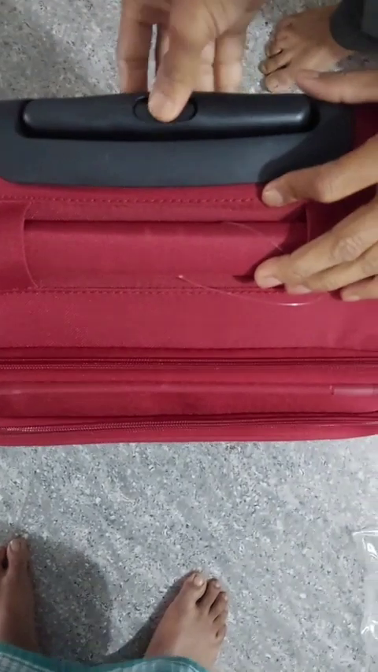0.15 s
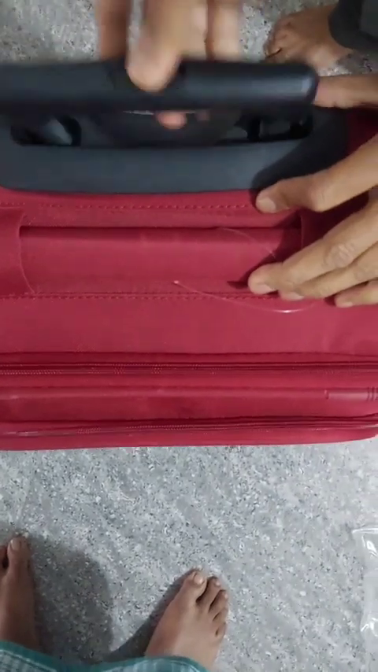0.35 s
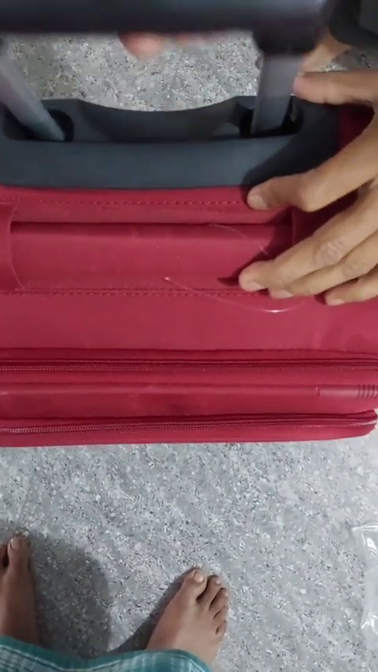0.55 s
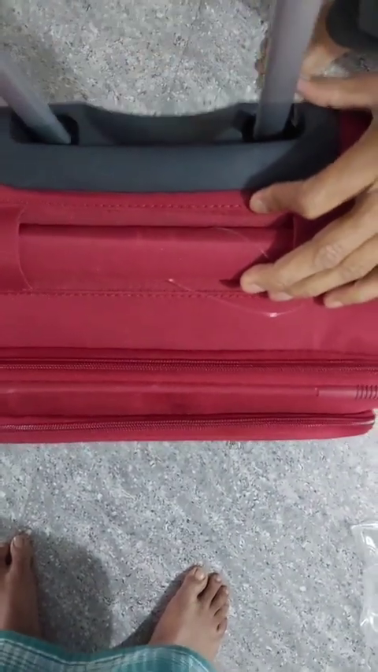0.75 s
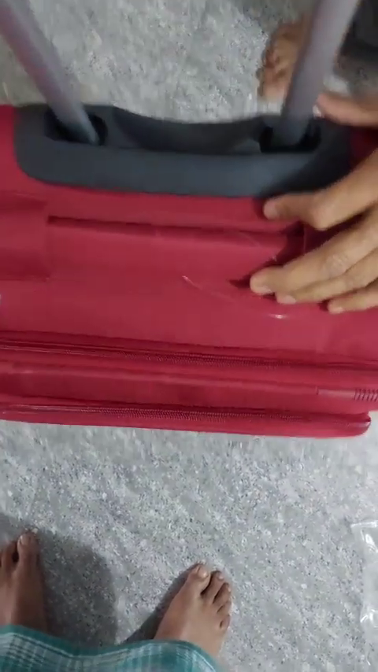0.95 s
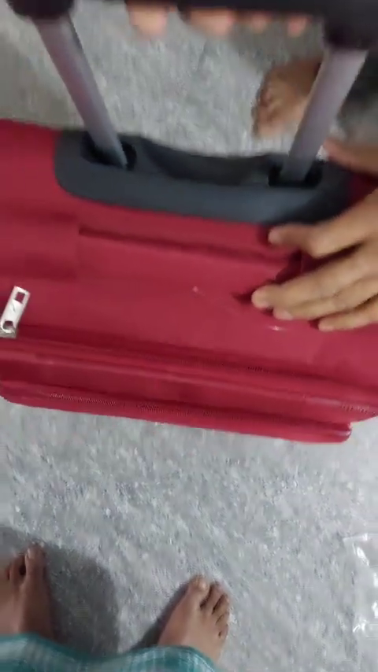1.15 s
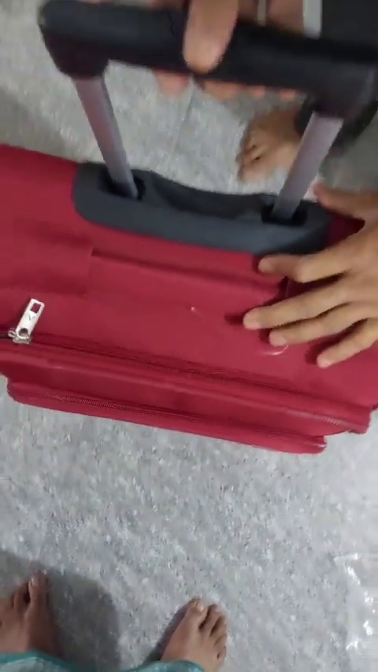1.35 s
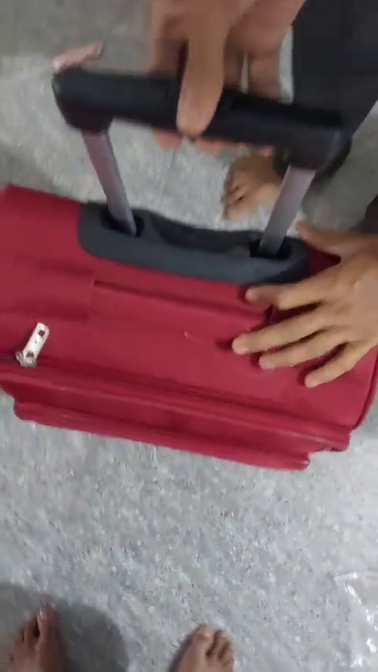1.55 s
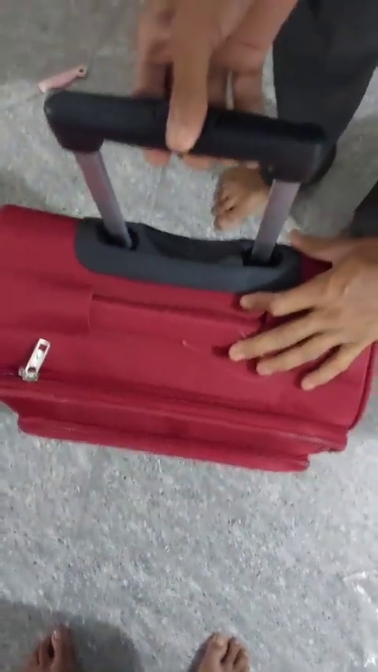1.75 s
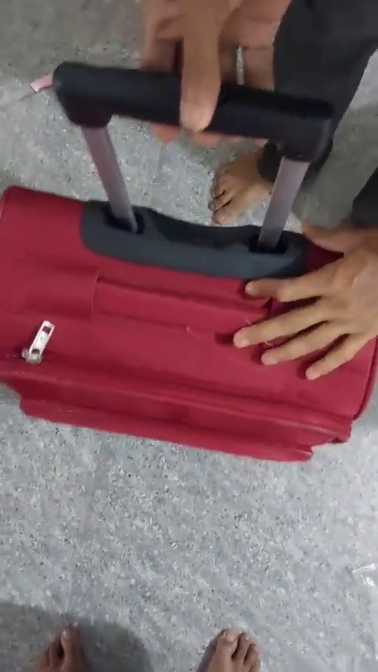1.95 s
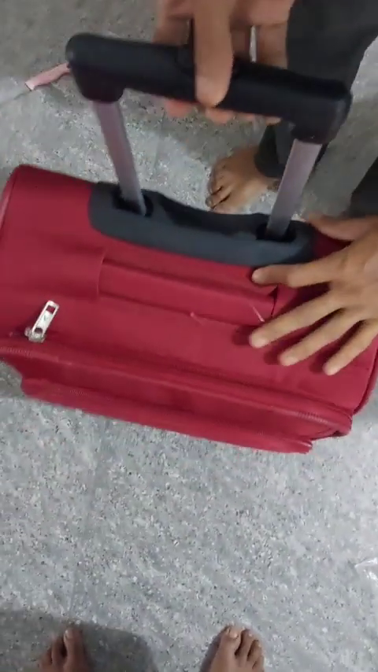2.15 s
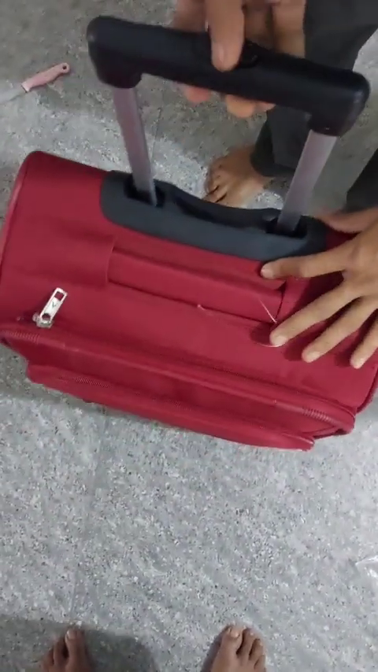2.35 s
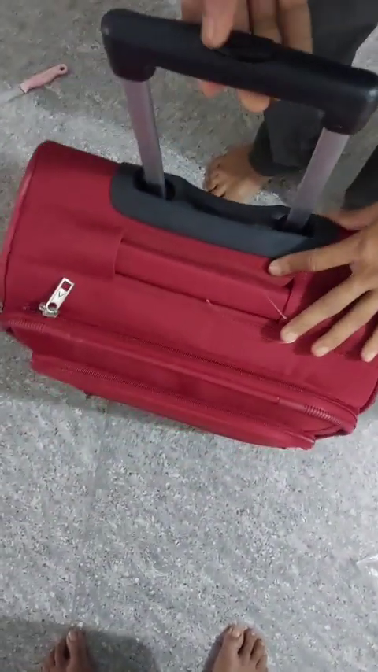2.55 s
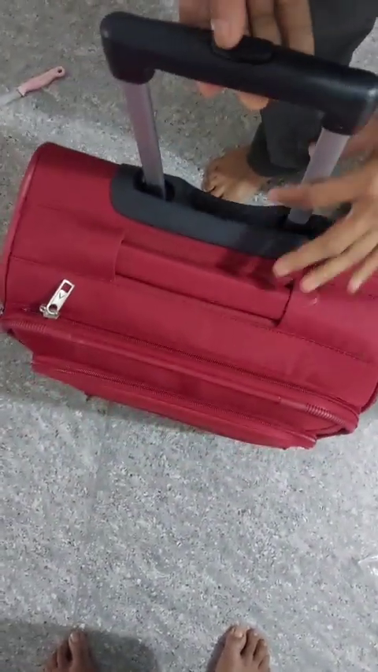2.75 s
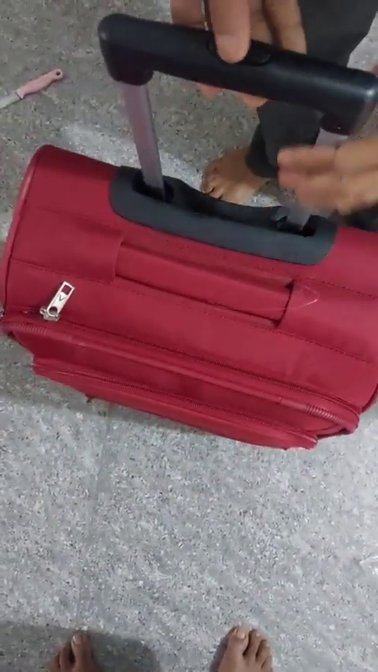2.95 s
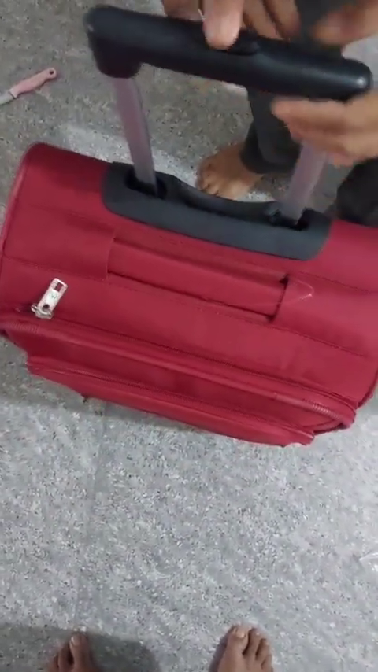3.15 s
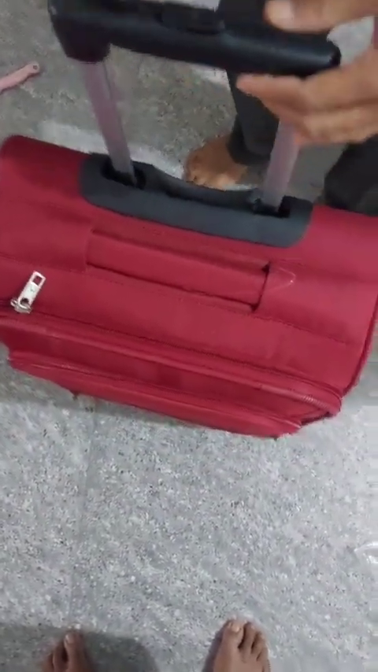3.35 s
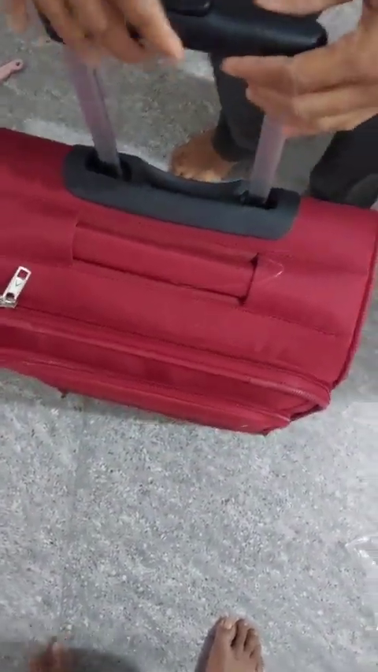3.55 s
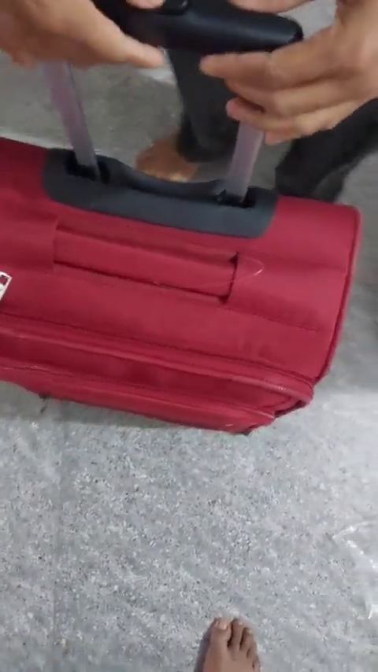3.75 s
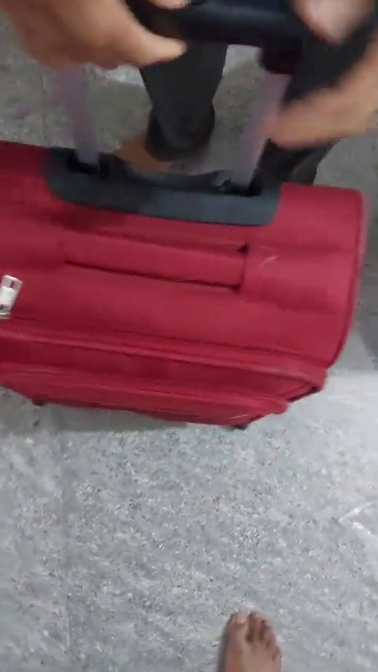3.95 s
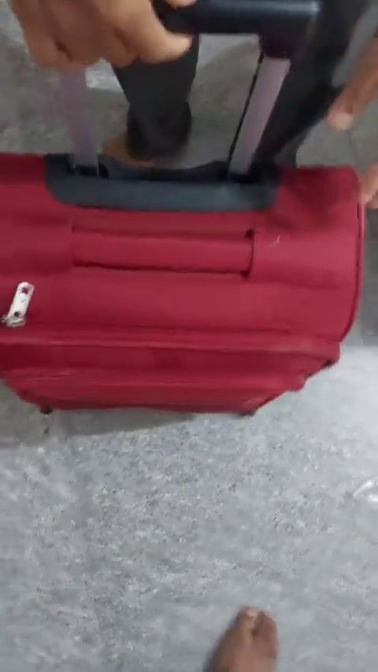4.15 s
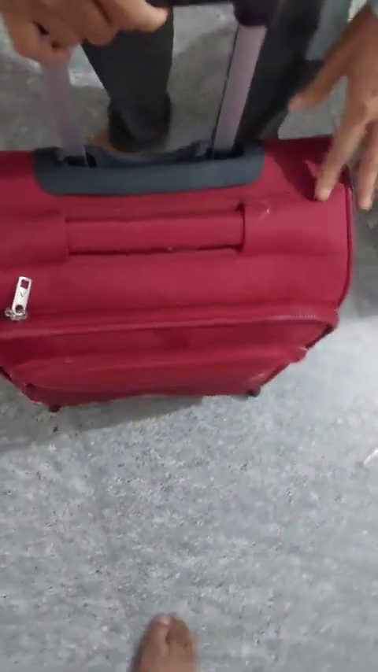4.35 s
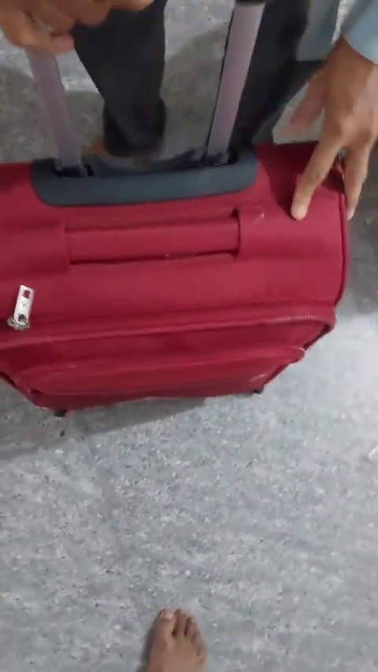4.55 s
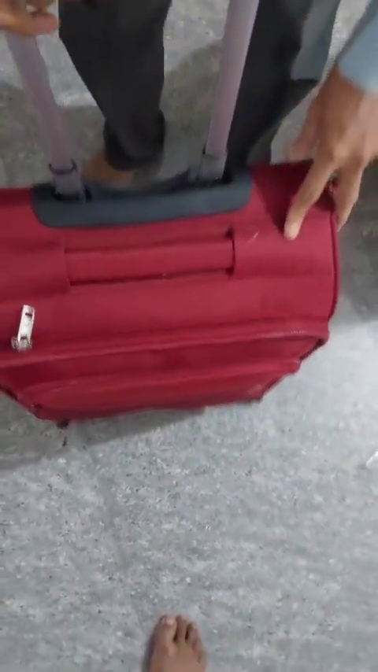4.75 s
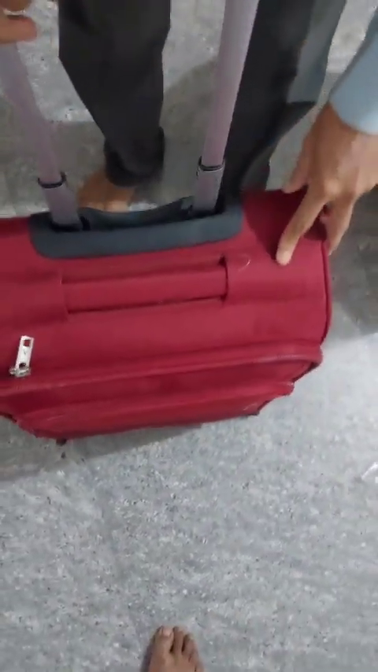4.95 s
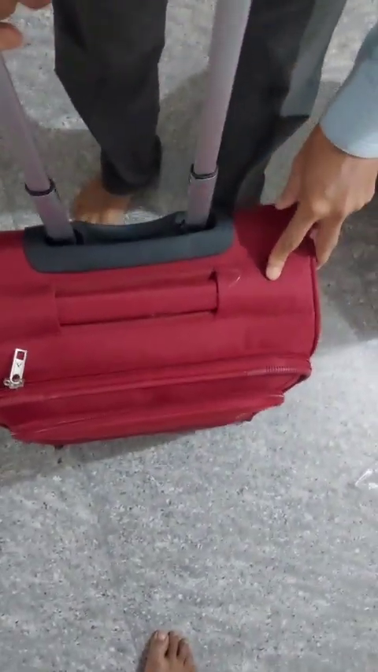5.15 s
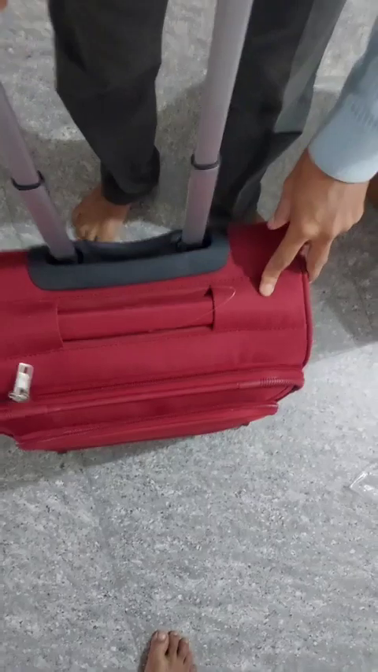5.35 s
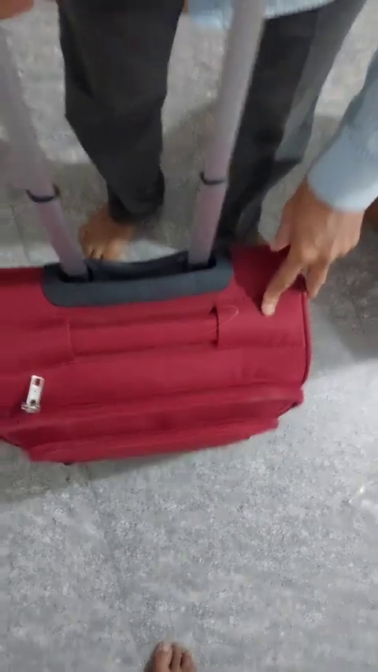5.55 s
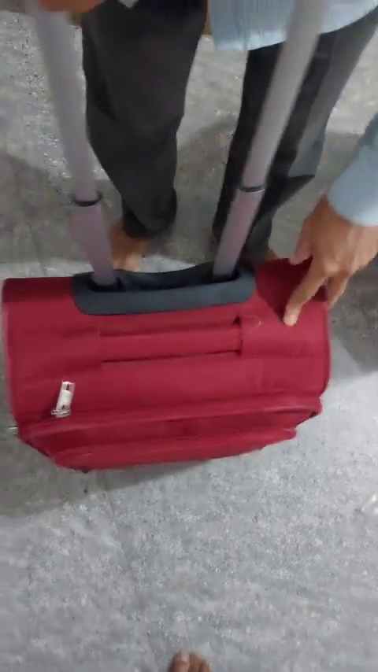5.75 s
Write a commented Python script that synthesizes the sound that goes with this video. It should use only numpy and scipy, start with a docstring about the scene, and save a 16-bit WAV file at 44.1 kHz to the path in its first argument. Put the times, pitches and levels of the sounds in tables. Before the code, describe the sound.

Soft thumps and small knocks open the sound as a hand grips the telescopic handle of a soft suitcase. From about 0.3 seconds the metal tubes slide out with a light swelling hiss, tick at 0.6, then squeak briefly and hit their stop at 0.8 with a sharp clack, the loudest moment. A zipper pull tinkles faintly until about 2 seconds, and a locking pin snaps sharply at 1.4. From 2 to 4.5 seconds it is quiet: hands brush the fabric, the case groans faintly as it turns on the floor, and the loose handle clacks lightly near 3.6. At 4.6 the case thumps dully and the handle extends further in jerks, with soft scraping and thin squeaks. Two sharp clicks with hollow thumps lock it at about 5.7 and 5.85. Everything sounds close, in a small, quiet room with short reverberation.

```python
"""The telescopic handle of a soft suitcase is pulled out in two stages in a small, hard-floored room.
Sliding friction makes its metal tubes hiss, and stick-slip makes them squeal. Impacts excite damped
modes: tubes knock on their stops, spring pins snap home, the hollow case thumps, a zipper pull tinkles.
Between the stages, hands brush the fabric and the case groans softly as it is turned on the floor."""
import sys
import numpy as np
from scipy import signal
from scipy.fft import rfft, irfft, next_fast_len
from scipy.io import wavfile
from scipy.ndimage import uniform_filter1d

SR = 44100
rng = np.random.default_rng(int(sys.argv[2]) if len(sys.argv) > 2 else 0)


def wav_out(sig):
    """Save sig, one row per channel (or a flat mono array), as 16-bit PCM at SR to the path in sys.argv[1]."""
    wavfile.write(sys.argv[1], SR, np.round(np.clip(np.atleast_2d(sig).T, -1, 1) * 32767).astype(np.int16))


N = 259308
TIME = np.arange(N) / SR


def undb(db):
    """Amplitude grows tenfold every 20 dB."""
    return 10 ** (np.asarray(db) / 20)

def unit(x):
    """Normalisation to an rms of 1."""
    return x / np.sqrt(np.mean(x ** 2))

def along(points, hz):
    """Interpolation of (Hz, value) points on a log-frequency axis."""
    f, value = np.transpose(points)
    return np.interp(np.log(np.maximum(hz, 1)), np.log(f), value)

def colour(x, spectrum):
    """Minimum-phase filtering by (Hz, dB) points, falling away below the first."""
    size = next_fast_len(2 * x.shape[-1], True) // 2 * 2
    hz = np.fft.rfftfreq(size, 1 / SR)
    gain = undb(along(spectrum, hz)) * np.clip(hz / spectrum[0][0], .1, 1) ** 2
    cepstrum = irfft(np.log(gain))
    cepstrum[1:size // 2] *= 2  # folding makes the filter causal
    cepstrum[size // 2 + 1:] = 0
    return irfft(rfft(x, size) * np.exp(rfft(cepstrum)))[..., :x.shape[-1]]

def wander(rate_hz):
    """Low-passed noise: a smooth random fluctuation of rms 1."""
    width = max(int(SR / rate_hz), 1)
    return unit(uniform_filter1d(uniform_filter1d(rng.standard_normal(N), width), width))

def fade(t, t60):
    """Exponential damping: 60 dB in t60 seconds."""
    return np.exp(-np.log(1000) * t / np.maximum(t60, .002))

def add(out, start, sound):
    """Superposition of a sound from its start time on."""
    i = max(int(start * SR), 0)
    out[..., i:i + sound.shape[-1]] += sound[..., :N - i]

def stroke(start, length, db, attack_s, release_s, db_per_s=0):
    """Amplitude envelope of a movement: linear rise, exponential trend, linear release."""
    t = TIME - start
    gate = np.clip(np.minimum(t / attack_s, 1 - (t - length) / release_s), 0, 1)
    return gate * undb(db + db_per_s * np.clip(t, 0, length))

def strokes(rows, attack_s, release_s, db_per_s=0):
    """Summed envelopes of like movements."""
    return sum(stroke(*row, attack_s, release_s, db_per_s) for row in rows)

def glide(start, length, hz, hz_per_s):
    """Linear frequency sweep while a movement lasts."""
    return hz + hz_per_s * np.clip(TIME - start, 0, length)

def friction(spectrum, grain_db, flutter_db):
    """Friction noise: countless tiny catches of unequal size come in uneven surges."""
    catches = rng.standard_normal(N) * undb(grain_db * wander(1600) + flutter_db * wander(19))
    return unit(colour(catches, spectrum))

def stick_slip(hz, roughness, rate_hz, overtone_db):
    """Stick-slip oscillation: a contact catches and slips unevenly, so its tone wavers."""
    phase = 2 * np.pi * np.cumsum(hz * (1 + roughness * wander(rate_hz))) / SR
    tone = np.sin(phase) + undb(overtone_db) * np.sin(2 * phase)
    return unit(tone * undb(1.27 * wander(rate_hz)))

def ringing(modes, t, t60):
    """Free vibration: damped modes, with random phases in each channel."""
    partials = (undb(db) * np.sin(2 * np.pi * (hz * t + rng.random((2, 1)))) for hz, db in modes)
    return sum(partials) * fade(t, t60)

def impacts(rows, modes, spectrum, ring_db, ring_t60, snap_db, rise_s):
    """Impact excitation: a snap, chatter and a brief ping, while the metal's modes ring on."""
    out, t = np.zeros((2, N)), np.arange(SR // 2) / SR
    hz, spectrum_db = np.transpose(spectrum)
    bins_hz = np.fft.rfftfreq(len(t), 1 / SR)
    for start, db, tilt_db, t60, ping_hz, ping_db, pan_db in rows:
        noise = rng.standard_normal((3, len(t)))
        chatter = (noise[0] + noise[1:]) * fade(t, t60)  # partly shared by both channels
        ping = undb(ping_db) * np.sin(2 * np.pi * ping_hz * t) * fade(t, t60)
        ring = undb(ring_db) * ringing(modes, t, ring_t60)
        blow = (chatter + ping + ring) * np.minimum(t / rise_s, 1)
        blow[:, int(rise_s * SR)] += undb(snap_db)
        tilted = np.column_stack([hz, spectrum_db + tilt_db * np.log2(hz / 3000)])
        filter_rms = np.sqrt(np.mean(undb(along(tilted, bins_hz)) ** 2))
        gains = undb(db + np.array([[pan_db], [-pan_db]]) / 2)
        add(out, start, colour(blow, tilted) / filter_rms * gains)
    return out

def diffuse_noise(size, unrelated_hz):
    """A diffuse field at two close points is coherent in the bass, incoherent in the treble."""
    mid, side = rng.standard_normal((2, size))
    apart = np.clip(np.fft.rfftfreq(size, 1 / SR) / unrelated_hz, .33, 1)
    mid = irfft(rfft(mid) * np.sqrt(1 - apart ** 2 / 2), size)
    side = irfft(rfft(side) * apart / np.sqrt(2), size)
    return np.array([mid + side, mid - side])


# Spectrum of still room air. Each row: frequency in Hz, level in dB.
AIR_SPECTRUM = [(45, -6.5), (65, 0.5), (100, -5.5), (270, -8), (500, -14), (1000, -18.5), (2800, -28.5),
                (5000, -29), (7700, -27), (9000, -32), (12500, -30), (16000, -38.5)]
def room_air():
    """Ambient noise forms a faint, steady diffuse field."""
    return undb(-68.5) * unit(colour(diffuse_noise(N, unrelated_hz=550), AIR_SPECTRUM))

# A hand taking hold or shifting. Each row: start in seconds, length in seconds, level in dB.
GRASP_STROKES = [(-0.03, 0.017, -43.5), (1.17, 0.21, -69), (1.77, 0.12, -77), (2.85, 0.067, -72),
                 (3.13, 0.053, -69.5), (3.97, 0.14, -67), (4.4, 0.19, -70), (4.575, 0.024, -43),
                 (4.76, 0.15, -67.5)]
# Spectrum of skin on the grip. Each row: frequency in Hz, level in dB.
GRIP_SPECTRUM = [(120, -5), (270, 3), (500, -8.5), (750, -4), (980, -1), (1250, -7), (1600, -6.5),
                 (2300, -9.5), (3500, -15.5), (6000, -33)]
def grip_grasps():
    """Friction of a hand on the grip gives a dull, surging rustle."""
    envelope = strokes(GRASP_STROKES, attack_s=0.03, release_s=0.04)
    return envelope * friction(GRIP_SPECTRUM, grain_db=0, flutter_db=4.5)

# A hand passing over the fabric. Each row: start in seconds, length in seconds, level in dB.
BRUSH_STROKES = [(-0.02, 0.13, -65), (0.41, 0.085, -55), (1.15, 0.12, -70), (1.24, 0.16, -61.5),
                 (2.11, 0.15, -60.5), (2.24, 0.31, -68.5), (2.595, 0.043, -65), (2.75, 0.25, -67),
                 (2.94, 0.2, -70), (3.1, 0.095, -66), (3.22, 0.092, -61), (3.79, 0.12, -78),
                 (4.04, 0.11, -66), (4.16, 0.24, -67), (4.375, 0.19, -63), (4.54, 0.066, -62.5),
                 (4.74, 0.22, -89), (5.53, 0.25, -63.5)]
# Spectrum of brushed fabric. Each row: frequency in Hz, level in dB.
FABRIC_SPECTRUM = [(2000, -12.5), (3200, -13), (4600, 4.5), (6800, 2.5), (9000, -3.5), (12500, 4.5),
                   (16000, -1)]
def fabric_brushes():
    """Friction on fabric gives a bright hiss that eases off through each stroke."""
    envelope = strokes(BRUSH_STROKES, attack_s=0.04, release_s=0.01, db_per_s=-42)
    return envelope * friction(FABRIC_SPECTRUM, grain_db=2, flutter_db=-4.9)

# Blows reaching the case. Each row: start in seconds, pulse level in dB, hardness (rattle gain) in dB.
CASE_BLOWS = [(0.013, -37.5, -3), (0.035, -45.5, 8), (0.062, -39, 0), (0.072, -36, -9), (0.275, -46.5, 6),
              (0.302, -45.5, -19), (0.599, -40.5, 1.5), (0.62, -41.5, -18), (0.823, -42, 13.5),
              (0.848, -30.5, 4.5), (1.425, -41.5, -1), (3.574, -53.5, 8.5), (4.053, -52, -17),
              (4.131, -54, -31), (4.601, -39, -15), (4.616, -31, -9), (4.636, -33, -22),
              (4.649, -36.5, 1.5), (4.672, -42, -18), (5.718, -32, 6), (5.742, -39, -4), (5.767, -37, 3),
              (5.852, -32, 10.5)]
# Modes of its panels and air, and spectrum of a dull blow. Each row: frequency in Hz, level in dB.
CASE_RESONANCES = [(82, -8.5), (135, -6.5), (168, -1.5), (190, 0), (243, 1), (275, -10.5), (320, -3.5),
                   (405, -5.5)]
PULSE_SPECTRUM = [(60, -10.5), (120, -16), (175, 1.5), (250, 3), (340, -10), (450, -7.5), (700, -15.5),
                  (1000, -19.5), (2000, -29.5), (6000, -49)]
def case_thumps():
    """A damped resonator: the padded case gives a pulse and a short boom; hard blows rattle fittings."""
    out, t = np.zeros((2, N)), np.arange(SR // 4) / SR
    pulse = colour(signal.unit_impulse(len(t)), PULSE_SPECTRUM)
    pulse /= np.abs(pulse).max()
    rattle_spectrum = [(400, -2.5), (800, -2), (1500, -28), (5000, -14.5), (15000, -47.5)]
    for start, db, hardness_db in CASE_BLOWS:
        # long waves: alike in both channels
        boom = ringing(CASE_RESONANCES, t, t60=0.06)[0] * np.minimum(t / 0.00083, 1)
        rattle = unit(colour(rng.standard_normal(len(t)), rattle_spectrum)) * fade(t, t60=0.02)
        add(out, start, undb(db) * (pulse + undb(-14.5) * boom + undb(hardness_db - 5) * rattle))
    return out

# Tubes hitting guides and stops. Each row: start in seconds, level in dB, tilt in dB per octave,
# contact t60 in seconds, ping frequency in Hz, relative ping level in dB, leftward pan in dB.
TUBE_KNOCKS = [(0.0752, -50, -0.5, 0.016, 1970, -26, -4), (0.2598, -48, -1, 0.016, 4280, -2, -2),
               (0.2758, -40.5, 0.5, 0.028, 1744, -2.5, -2), (0.3034, -45.5, -0.5, 0.035, 1780, -1, 0),
               (0.3536, -48, -0.5, 0.027, 1830, -12, -5), (0.8114, -23, 1.5, 0.028, 2960, -5.5, -3.5),
               (0.8166, -7.5, 1.26, 0.014, 2741, -8, -1.7), (0.8314, -24, -1.5, 0.012, 2400, -10, 1.5),
               (0.8434, -24, -0.5, 0.016, 7550, -1.5, -8.5), (0.8464, -26.5, -0.5, 0.01, 1940, -21, 5),
               (4.0526, -45.5, 9.5, 0.013, 1940, -15, 7.5), (4.0575, -44.5, -0.1, 0.02, 1790, -20, 4),
               (5.7274, -31.5, -0.5, 0.084, 1930, -21, 2.5)]
# Modes of frame and sleeves, and spectrum of a knock. Each row: frequency in Hz, level in dB.
FRAME_RESONANCES = [(655, 7), (745, -11.5), (1090, -7.5), (1808, 2), (1949, 4.5), (2115, -9.5), (2498, 0.5),
                    (2622, -5), (2785, 1.5), (3305, -10.5), (3710, -10), (4274, -7.5), (4721, -2),
                    (4867, -3), (5464, 1), (6821, -2), (7181, -8.5), (7558, 3.5)]
KNOCK_SPECTRUM = [(400, -6.5), (700, -4), (1150, -4), (2000, 2), (2800, -2), (3900, -4.5), (5000, -0.5),
                  (7200, -5.5), (9000, -12), (15000, -12.5)]
def tube_knocks():
    """Abrupt impacts of the tubes excite the modes of the frame."""
    return impacts(TUBE_KNOCKS, FRAME_RESONANCES, KNOCK_SPECTRUM,
                   ring_db=-25.5, ring_t60=0.08, snap_db=10, rise_s=0.001)

# Pulls on each stage of the handle. Each row: start in seconds, length in seconds, level in dB.
SHORT_STAGE_PULLS = [(0.285, 0.52, -63)]
LONG_STAGE_PULLS = [(4.61, 0.32, -55), (4.89, 0.11, -58), (5.18, 0.14, -58), (5.35, 0.059, -56.5)]
# Spectrum of each sliding stage. Each row: frequency in Hz, level in dB.
SHORT_STAGE_SPECTRUM = [(88, -42), (150, -14.5), (182, -2.5), (291, -14), (328, -6.5), (376, -9.5),
                        (790, -2.5), (854, -8.5), (2310, -15.5), (3100, -5.5), (10000, -18), (14000, -17),
                        (16000, -21)]
LONG_STAGE_SPECTRUM = [(150, 6), (280, 4.5), (500, -1), (1300, -9), (1650, -4), (1950, 8.5), (2300, 5),
                       (2900, 2.5), (3550, 2), (4200, -12), (5500, -1), (7000, -9), (8500, -17),
                       (15000, -17)]
def tube_slides():
    """Sliding friction in the sleeves: the short stage hisses in one swell, the long in fading jerks."""
    swell = strokes(SHORT_STAGE_PULLS, attack_s=0.0256, release_s=0.045, db_per_s=14)
    jerks = strokes(LONG_STAGE_PULLS, attack_s=0.0256, release_s=0.045, db_per_s=-30.5)
    return (swell * friction(SHORT_STAGE_SPECTRUM, grain_db=1.5, flutter_db=1.8)
            + jerks * friction(LONG_STAGE_SPECTRUM, grain_db=2, flutter_db=1.8))

# Spring pins snapping. Each row: start in seconds, level in dB, tilt in dB per octave,
# contact t60 in seconds, ping frequency in Hz, relative ping level in dB, leftward pan in dB.
PIN_SNAPS = [(0.5806, -27.5, 3.5, 0.027, 3730, -13, -2), (0.5955, -25, 3, 0.023, 3550, -10, -10),
             (1.296, -43.5, 1, 0.018, 4030, 6.5, 0), (1.4148, -13, 1, 0.021, 2110, -5, 5),
             (1.4205, -22, -3.7, 0.021, 2112, -5.5, 3.5), (5.7112, -34.5, 0, 0.05, 5820, -38, 14.5),
             (5.7168, -19, 8.5, 0.028, 1430, 4, 3), (5.8452, -25, 2.1, 0.0205, 4930, 2.5, 11.5)]
# Modes of the tube walls, and spectrum of a snap. Each row: frequency in Hz, level in dB.
TUBE_RESONANCES = [(754, 0), (1556, -7), (1810, -1), (2075, 0), (2130, 2), (2165, 1.5), (2245, -5.5),
                   (2325, -10), (2562, -1), (2896, -7), (4323, -15), (4877, -9.5), (5195, -9), (5292, -4.5),
                   (6083, -12), (6595, -8)]
PIN_SPECTRUM = [(400, -10), (600, -15.5), (830, -4), (1100, -9), (1600, 2), (2100, 1.5), (2800, 0),
                (3800, -8), (5200, 1), (7000, -7.5), (9000, -11.5), (15000, -15)]
def spring_pins():
    """Spring-driven impacts of the pins excite the modes of the tube walls."""
    return impacts(PIN_SNAPS, TUBE_RESONANCES, PIN_SPECTRUM,
                   ring_db=-31.5, ring_t60=0.14, snap_db=11, rise_s=0.004)

# A sleeve binding on its tube. Each row: start in seconds, length in seconds, pitch in Hz,
# glide in Hz per second, level in dB, roughness as a fraction of the pitch.
SLEEVE_SQUEALS = [(0.656, 0.08, 3050, 0, -57, 0.21), (0.804, 0.013, 3600, -30000, -30.5, 0.11),
                  (4.597, 0.027, 1827, -2500, -48.5, 0.048), (4.634, 0.091, 1770, 1200, -67, 0.021),
                  (5.183, 0.11, 1924, -700, -62, 0.06), (4.661, 0.03, 3250, 2502, -61, 0.058),
                  (4.744, 0.06, 3470, 800, -59.5, 0.0098), (4.887, 0.034, 3541, 500, -42, 0.005),
                  (4.952, 0.088, 3570, 310.5, -71.5, 0.0074), (4.994, 0.152, 3200, 805, -67, 0.04),
                  (5.36, 0.087, 3570, 310, -64, 0.037), (5.535, 0.032, 3170, -1400, -54, 0.059),
                  (5.569, 0.065, 3130, -1000, -70.5, 0.066), (5.667, 0.03, 3060, -1000, -58, 0.12)]
def sleeve_squeals():
    """Stick-slip in a sleeve gives a squeal, which strong frequency jitter broadens to a scrape."""
    out = np.zeros(N)
    for start, length, hz, hz_per_s, db, roughness in SLEEVE_SQUEALS:
        tone = stick_slip(glide(start, length, hz, hz_per_s), roughness, rate_hz=320, overtone_db=-26)
        out += stroke(start, length, db, attack_s=0.021, release_s=0.029) * tone
    return out

# The loose handle shifting. Each row: start in seconds, level in dB, contact t60 in seconds.
HANDLE_NUDGES = [(0.703, -45.5, 0.062), (2.939, -51.5, 0.053), (3.158, -55.5, 0.078), (3.297, -54, 0.055),
                 (3.534, -51.5, 0.11), (3.57, -34.5, 0.029), (3.808, -63, 0.2), (3.9459, -58.5, 0.09),
                 (4.5989, -35, 0.029), (5.8303, -36, 0.037)]
# Spectrum of its dull clack. Each row: frequency in Hz, level in dB.
NUDGE_SPECTRUM = [(400, 1), (750, -0.5), (1200, -3.5), (2000, 0), (3200, -0.5), (5000, -5.5), (7500, -11),
                  (9000, -16.5), (15000, -19)]
def handle_nudges():
    """Soft impacts: the handle moves within its play and meets the frame with little snap."""
    ping_hz, ping_db = 2060, -14.5
    rows = [(start, db, 0, t60, ping_hz, ping_db, 0) for start, db, t60 in HANDLE_NUDGES]
    return impacts(rows, FRAME_RESONANCES, NUDGE_SPECTRUM,
                   ring_db=-24.5, ring_t60=0.08, snap_db=-11.5, rise_s=0.0067)

# A zipper pull swinging as the case is jolted or sways. Each row: start in seconds, level in dB.
ZIPPER_TINKLES = [(0.925, -57.5), (0.971, -66), (1.025, -65), (1.068, -67), (1.13, -79), (1.52, -62),
                  (1.755, -75.5), (1.9, -59.5), (2.023, -78)]
# Modes of its thin metal tab. Each row: frequency in Hz, level in dB.
TAB_RESONANCES = [(7930, 5.5), (8950, 1.5), (12700, 0), (13240, 1), (14450, -5), (15400, -0.5)]
def zipper_pull():
    """A small plate has high modes: the tab rings as it chatters against its slider."""
    out, t = np.zeros((2, N)), np.arange(SR // 2) / SR
    chatter_spectrum = [(6700, -20), (8300, -0.5), (10500, -8), (14000, 5.5)]
    for start, db in ZIPPER_TINKLES:
        chatter = colour(rng.standard_normal((2, len(t))), chatter_spectrum) * fade(t, t60=0.17)
        tinkle = ringing(TAB_RESONANCES, t, t60=0.08) + undb(7) * chatter
        add(out, start, undb(db) * tinkle * np.minimum(t / 0.0027, 1))
    return out

# Rubs along the grip. Each row: start in seconds, length in seconds, resonance in Hz, level in dB.
GRIP_RUBS = [(1.147, 0.21, 993, -68), (2.125, 0.48, 1095, -80.5), (2.832, 0.089, 915, -69)]
def grip_rubs():
    """Stick-slip of skin sounds the resonance of the hollow plastic grip."""
    out = np.zeros(N)
    for start, length, hz, db in GRIP_RUBS:
        tone = stick_slip(hz, roughness=0.14, rate_hz=810, overtone_db=-25)
        out += stroke(start, length, db, attack_s=0.03, release_s=0.04) * tone
    return out

# Three shoves that turn the case. Each row: start in seconds, length in seconds, resonance in Hz,
# glide in Hz per second, level in dB.
FLOOR_DRAGS = [(2.523, 0.036, 424.6, -170, -65.5), (2.836, 0.14, 417, -170, -65),
               (3.096, 0.185, 354, 543, -68)]
def floor_drags():
    """Stick-slip against the floor makes the turning case groan."""
    out = np.zeros(N)
    for start, length, hz, hz_per_s, db in FLOOR_DRAGS:
        pitch = glide(start, length, hz, hz_per_s)
        groan = stick_slip(pitch, roughness=0.17, rate_hz=130, overtone_db=-22)
        out += stroke(start, length, db, attack_s=0.039, release_s=0.043) * groan
    return out

# Decay of the room. Each row: frequency in Hz, reverberation time in seconds.
REVERB_TIMES = [(100, 0.21), (250, 0.24), (700, 0.35), (2000, 0.34), (5000, 0.31), (14000, 0.15)]
# Spectrum of its tail. Each row: frequency in Hz, level against the direct sound in dB.
REVERB_SPECTRUM = [(100, 6.5), (250, 5), (700, 0), (2000, -0.5), (5000, -4), (14000, -2.5)]
def reverberation(source, build_s):
    """Reflections from bare walls and a stone floor merge into a short diffuse tail."""
    t, hz = np.arange(SR) / SR, np.fft.rfftfreq(SR, 1 / SR)
    noise = rfft(diffuse_noise(SR, unrelated_hz=690))
    centres, tail = np.transpose(REVERB_TIMES)[0], 0
    for (_, t60), weights in zip(REVERB_TIMES, np.eye(len(centres))):
        band = irfft(noise * along(np.column_stack([centres, weights]), hz), SR)
        envelope = fade(t, t60) * np.minimum(t / build_s, 1) ** 2
        tail += band * envelope / np.linalg.norm(envelope)
    return signal.fftconvolve(source[None], colour(tail, REVERB_SPECTRUM), axes=1)[:, :N]

# Stereo balance. Each row: frequency in Hz, left minus right level in dB.
STEREO_BALANCE = [(100, -4), (280, 3), (550, 0), (1000, -1.5), (2000, 4), (4500, -2.5), (8000, 1),
                  (13000, -3)]
def scene():
    """Direct and reverberant sound superpose; an arrival-time difference sets the case to the right."""
    suitcase = spring_pins() + tube_knocks() + case_thumps() + zipper_pull() + handle_nudges()
    suitcase += tube_slides() + sleeve_squeals()
    suitcase += fabric_brushes() + grip_grasps() + grip_rubs() + floor_drags()
    left_lag_s = 0.0002864
    direct = np.array([np.interp(TIME - left_lag_s, TIME, suitcase[0]), suitcase[1]])
    in_room = direct + reverberation(suitcase.mean(axis=0), build_s=0.01)
    lean_db = along(STEREO_BALANCE, np.fft.rfftfreq(N, 1 / SR))
    balanced = irfft(rfft(in_room) * undb(np.array([lean_db, -lean_db]) / 2), N)
    return balanced + room_air()

def record(dry):
    """Band limiting and soft saturation: the microphone thins the bass, rounds peaks, cuts the top."""
    bass_hz, top_hz, ceiling = 54, 16100, 0.85
    thinned = signal.sosfilt(signal.butter(2, bass_hz, "highpass", fs=SR, output="sos"), dry)
    rounded = ceiling * np.tanh(thinned / ceiling)
    return signal.sosfilt(signal.ellip(10, .2, 70, top_hz, fs=SR, output="sos"), rounded)


dry = scene()
out = record(dry)
wav_out(out)
```